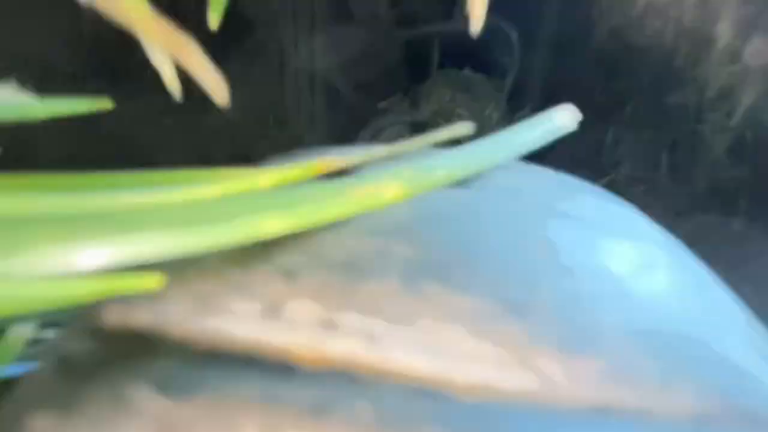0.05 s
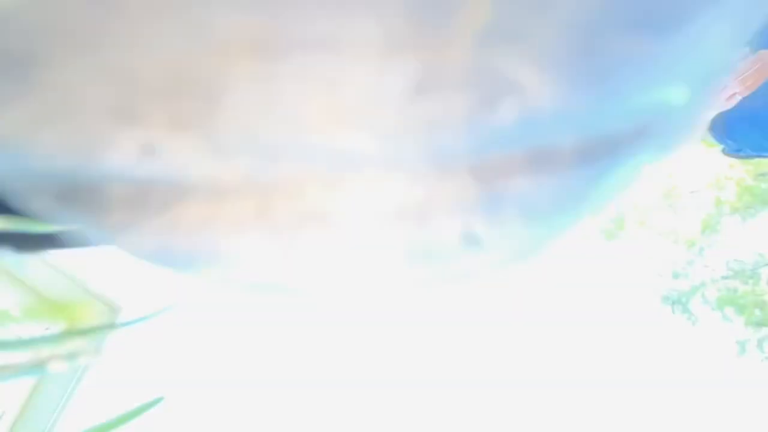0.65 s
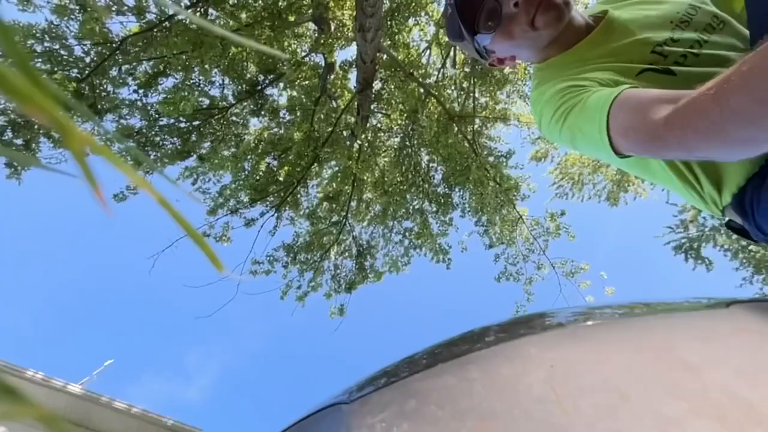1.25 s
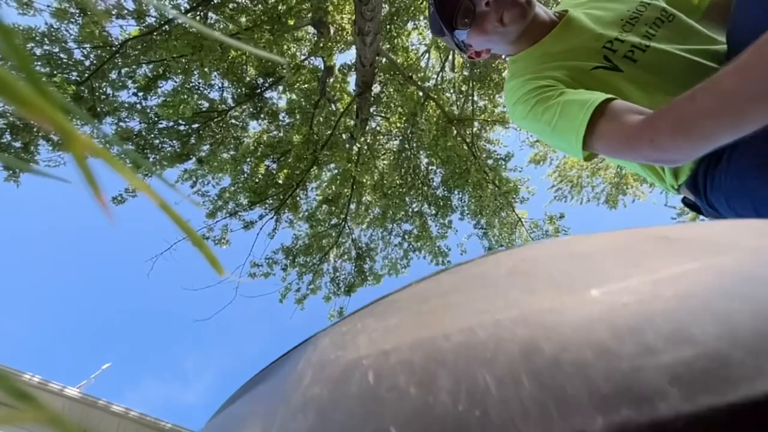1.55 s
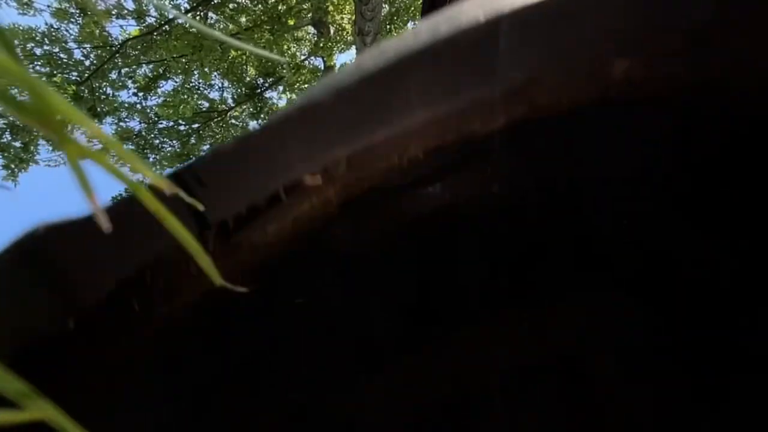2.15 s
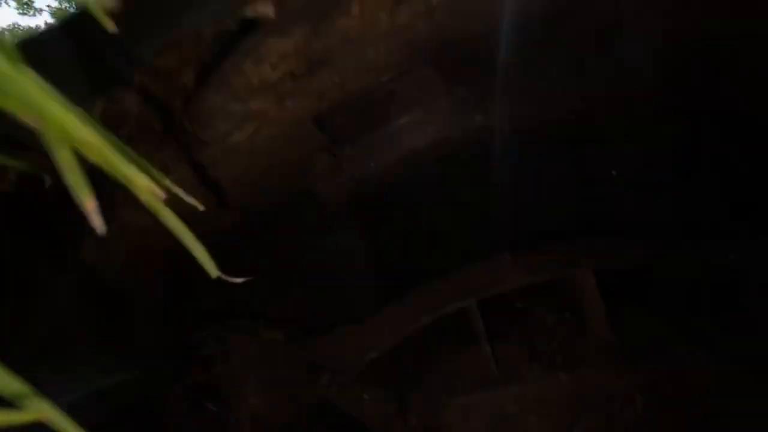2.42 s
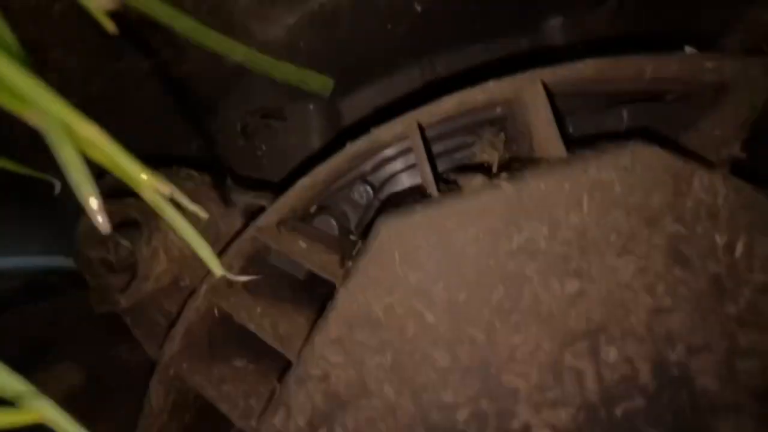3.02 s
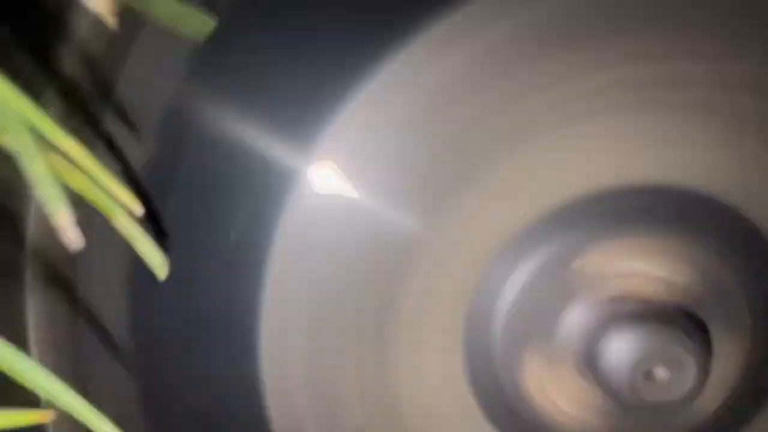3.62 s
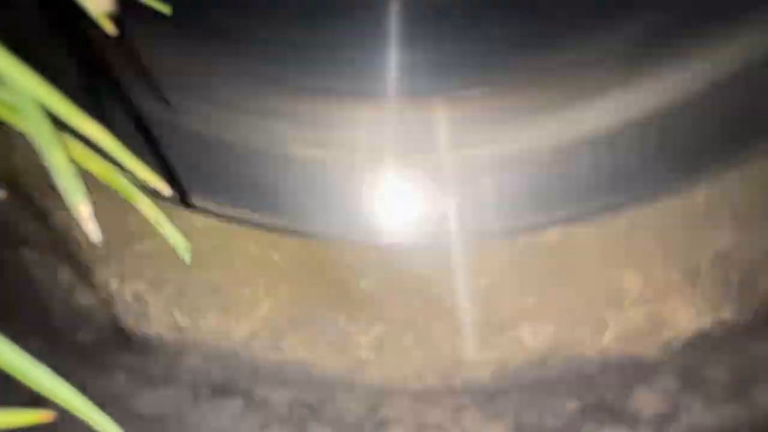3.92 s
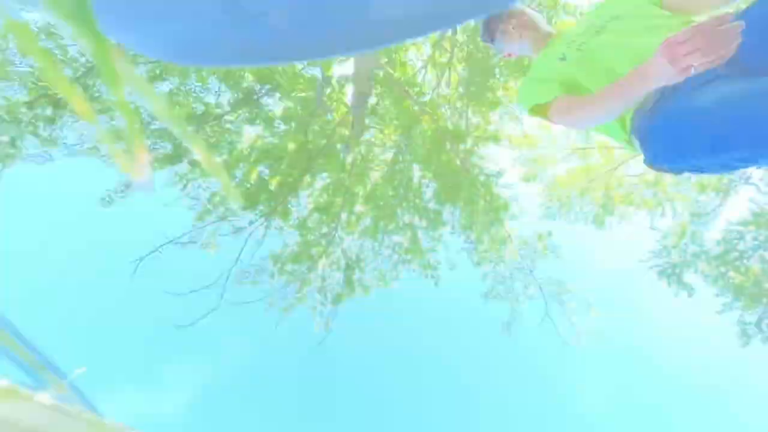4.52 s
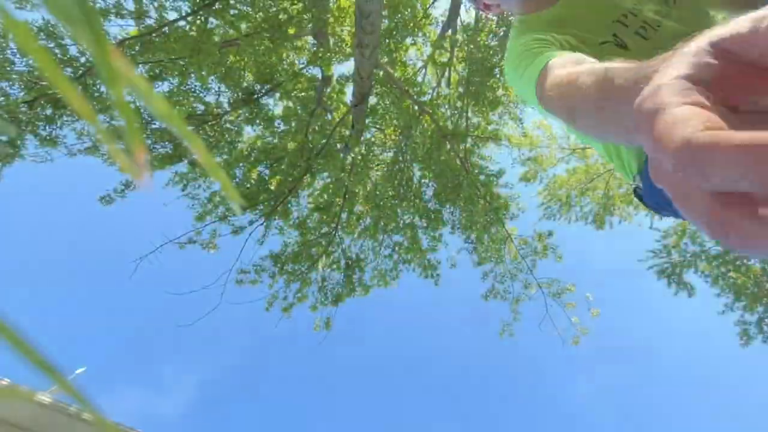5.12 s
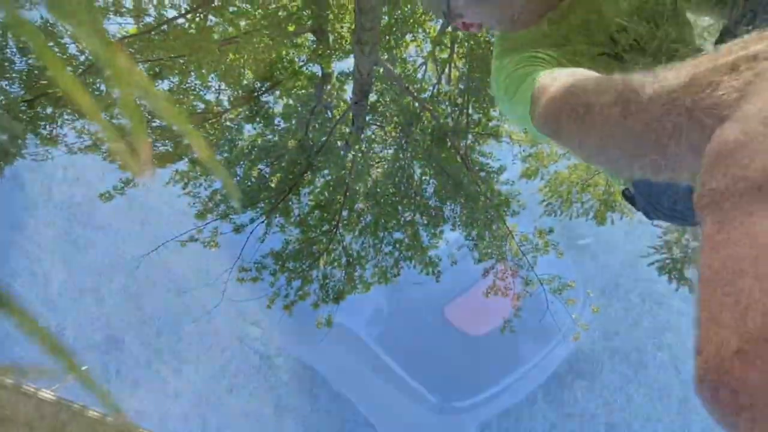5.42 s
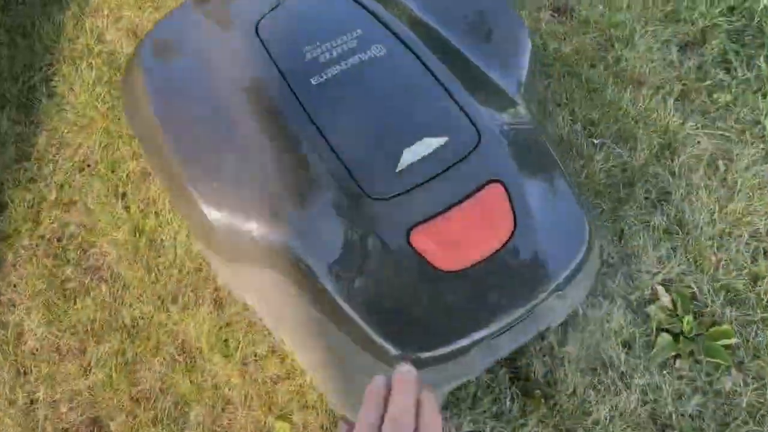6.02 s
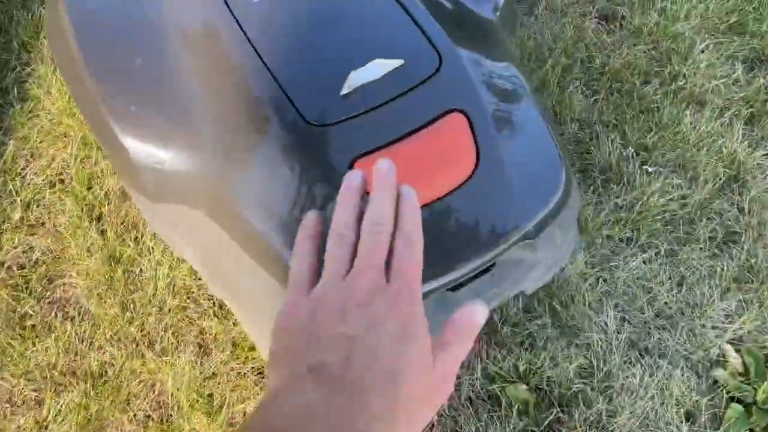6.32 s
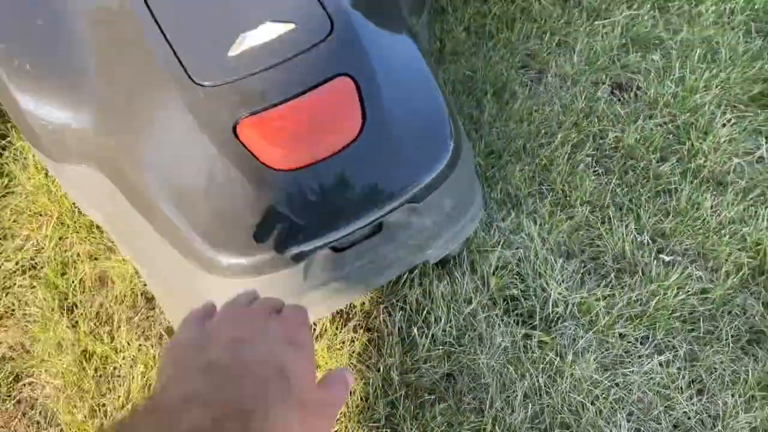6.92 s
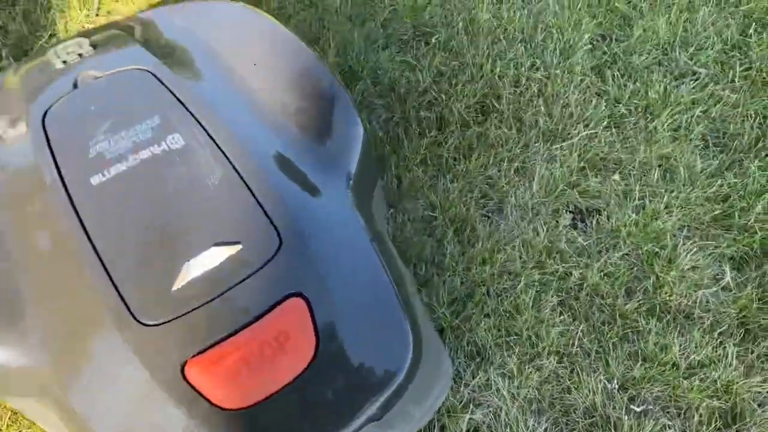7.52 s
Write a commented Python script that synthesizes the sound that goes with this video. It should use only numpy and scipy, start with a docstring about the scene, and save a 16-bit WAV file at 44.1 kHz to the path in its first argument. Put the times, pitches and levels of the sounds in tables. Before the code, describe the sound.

Slowed, muffled rolling and grass cutting with a few soft bumps draw near at ground level. Then the robotic mower's spinning blades sweep over the microphone in a brief, loud, hollow rush with a low hum and sharp rasps. Softer mowing and a thin gear whine follow. A few taps lead to one sharp slap on the plastic shell, which rattles, and the mower fades into faint outdoor air.

```python
"""A robotic mower rolls up to a microphone lying in the lawn, at first dull and deep as in slow motion.
Its blade disc passes right overhead: each blade pushes a pulse of air, which makes a hum, and thousands
of tiny grass cuts ring the hollow under the shell. Gears whine as it moves off. Then, heard from above,
it drives on until a hand slaps the stop button; the plastic shell rattles and the motors run down."""
import sys
import numpy as np
from scipy import signal
from scipy.fft import rfft, irfft, next_fast_len
from scipy.io import wavfile
from scipy.ndimage import uniform_filter1d

SR = 44100
rng = np.random.default_rng(int(sys.argv[2]) if len(sys.argv) > 2 else 0)


def unload_wav(signal):
    """Save mono or channel-first audio to the path in sys.argv[1] as 16-bit WAV at rate SR, clipped to [-1, 1]."""
    wavfile.write(
        sys.argv[1],
        SR,
        np.round(np.clip(np.atleast_2d(signal).T, -1, 1) * 32767).astype(np.int16),
    )


N = 341798
TIME, FFT_SIZE = np.arange(N) / SR, next_fast_len(N)
FREQS = np.fft.rfftfreq(FFT_SIZE, 1 / SR)
HIT_SIZE, LEAD_S = 16384, .01  # samples in one short hit, and the pause before it starts
HIT_TIME = np.maximum(np.arange(HIT_SIZE) / SR - LEAD_S, 0)
HIT_FREQS = np.fft.rfftfreq(HIT_SIZE, 1 / SR) + 1
SLOW, SLOW_EDGE_HZ, SLOW_END_S = .25, 4830, 3.06  # slow motion: speed, treble limit, end
BLADE_HZ = 114.3  # blades passing per second
LEAVING_S, STOP_S = 4.2, 6.86  # the mower moves off; its motors are switched off

# resonances of the hollow under the shell: f/Hz, width/Hz, lift/dB
HOLLOW_RESONANCES = [(566, 31, 4), (1049, 100, 9), (1590, 150, 2), (2340, 170, 2.5), (2784, 170, 7),
                     (3153, 96, 4.5), (3430, 130, 4.5), (3740, 180, -3), (3860, 120, 4.5), (4760, 44, 9),
                     (5350, 570, 8.5), (5834, 250, -10.5), (6560, 790, 5), (11200, 780, -4.5),
                     (12300, 1600, -0.5)]
# the microphone's two openings, lying in the grass and held above:
# f/Hz, likeness of left and right/0-1, lead of left/rad, left over right/dB
MIC_IN_GRASS = [(100, 0.5, 1, 4), (487, 0.4, 1.68, 1), (1100, 0.25, 2.5, 0.5), (1990, 0.2, 3, -2.5),
                (3140, 0.05, 2.5, 2), (5300, 0, 3, 8.5), (8000, 0.2, 2.5, 0.5), (8950, .6, 0, -3.5),
                (9750, 0.6, 1.94, -2.5), (10700, .95, 0.5, -1), (13200, 1, 0, -0.5), (13800, 0.7, -0.2, 0),
                (14550, .5, -3, -1), (14900, 0.95, -2, 0.5)]
MIC_ABOVE = [(99, 0.66, 0.28, -1.5), (1600, 0.7, -0.7, 1.5), (2900, 0.24, 3, -2), (4240, 0.37, 2, -2.5),
             (4900, 0.64, 1.1, -1), (5980, 1, 3, 2), (7800, 1, 6.5, 0), (8370, .9, 7.5, -2.5),
             (10500, 1, 8.5, 1.5), (11100, 0.88, 9.5, -1), (11400, .45, 14.5, -1.5), (11800, 1, 13, 1),
             (13100, 0.83, 13.5, -1), (14500, .9, 15.5, 1)]


def amp(db):
    """Turns decibels into a gain."""
    return 10 ** (np.asarray(db) / 20)


def unit(x):
    """Scales a signal to an average power of 1."""
    return x / np.sqrt(np.mean(x ** 2) + 1e-20)


def read(points, hz):
    """Reads between the rows of a table, on a scale of octaves."""
    f, value = np.transpose(points)
    return np.interp(np.log(hz + 1), np.log(f + 1), value)


def curves(rows):
    """Turns rows of (t/s, values...) into one curve per value, sample by sample."""
    s, *columns = np.transpose(rows)
    return [np.interp(TIME, s, c) for c in columns]


def between(start, end):
    """Fades in after start and out before end."""
    return np.clip(np.minimum(TIME - start, end - TIME) * 10, 0, 1)


def since(s):
    """Seconds gone by since s, zero before."""
    return np.maximum(TIME - s, 0)


def wander(per_s):
    """A random curve of size 1 that turns per_s times a second."""
    steps = rng.standard_normal(4096)
    return unit(np.interp(TIME * per_s, np.arange(len(steps)), steps))


def panned(x, pan_db):
    """Makes the left side pan_db louder than the right."""
    return np.vstack([x * amp(pan_db / 2), x * amp(-pan_db / 2)])


def place(hits):
    """Mixes (start time, stereo sound) pairs into one track."""
    mix = np.zeros((2, N))
    for s, sound in hits:
        part = mix[:, max(round((s - LEAD_S) * SR), 0):][:, :sound.shape[1]]
        part += sound[:, :part.shape[1]]
    return mix


def low_pass(x, hz):
    """Cuts off the treble above hz."""
    return signal.oaconvolve(x, signal.firwin(601, hz, window=("kaiser", 9), fs=SR)[None], "same")


def lift(resonances, at_hz):
    """How many dB a set of resonances adds at each frequency."""
    return sum(db / (1 + (2 * (at_hz - hz) / width) ** 2) for hz, width, db in resonances)


def microphone(pair, mic, hz):
    """Turns two unrelated spectra into what the left and right openings pick up."""
    f, *columns = np.transpose(mic)
    same, phase, pan_db = (np.interp(hz, f, c) for c in columns)
    same = np.clip(same, 0, 1)
    right = (same * pair[0] + np.sqrt(1 - same ** 2) * pair[1]) * np.exp(-1j * phase)
    return np.array([pair[0], right]) * panned(1, pan_db)


def grass_cuts(per_s, spread_db, hiss, patch_db, size):
    """Spectra of two streams of tiny cuts in a hiss of air; each tuft favours other pitches."""
    strength = amp(spread_db * np.minimum(rng.exponential(1, (2, N)), 4)) * rng.choice([-1, 1], (2, N))
    clicks = unit(strength * (rng.random((2, N)) < per_s / SR))
    frames = signal.stft(clicks + hiss * rng.standard_normal((2, N)), nperseg=size)[2]
    patches = uniform_filter1d(rng.standard_normal(frames.shape[1:]), size=4, axis=0)  # blur in pitch
    patches = unit(uniform_filter1d(patches, size=6, axis=1))  # and in time
    return rfft(signal.istft(frames * amp(patch_db * patches))[1][:, :N], FFT_SIZE)


def travel(layers, span):
    """Each layer's level in dB: a steady drift, brief rustles, and a bright swell as slow motion ends."""
    # rustles and the swell: t/s, length/s, rolling lift/dB, cutting lift/dB, fizz lift/dB
    swells = [(0, 0.42, 2, 10.5, 0), (0.42, 0.14, 1, -2.5, 0), (1.491, 0.24, 3, 3.5, 0),
              (2.843, 0.057, 3, 1, 0), (3.074, .04, 1, 2, 1), (3.167, 0.12, 2, 5.5, 8.5),
              (4.665, 0.11, 0, 9, 8.5), (5.313, 0.093, 3, 6.5, 4), (5.474, .09, 1, 6.5, 5.5),
              (5.675, 0.08, 0, 4.5, 2.5), (6.092, 0.22, 4.5, 4, 2.5), (6.877, 0.12, 2, -1.5, -1),
              (7.184, 0.095, 5.5, 8, 8)]
    attack_s, release_s, lift_db = 0.012, 0.019, 0
    for s, length, *lifts in swells:
        swell = np.minimum(since(s) / attack_s, 1) * np.exp(-since(s + length) / release_s)
        lift_db = lift_db + np.outer(lifts, swell)
    return [db + drift * (TIME - span[0]) + extra for (db, drift), extra in zip(layers, lift_db)]


def mowing(cuts, levels, span, colour, flutter_db, flutter_per_s, fade_s,
           speed=0.97, hollow=HOLLOW_RESONANCES, mic=MIC_IN_GRASS):
    """Cuts and air ring the hollow, in up to three layers: low rolling, middle cutting, high fizz."""
    full_hz = FREQS / speed  # slowing down lowers every resonance alike
    spectra = microphone(cuts, mic, full_hz) * amp(read(colour, FREQS) + lift(hollow, full_hz))
    band = np.digitize(FREQS, [1800, 7000])  # the layers meet here, in Hz
    tufts, out = wander(flutter_per_s), 0
    for k, level_db in enumerate(levels):
        # tufts of grass shake all layers together, and each a little on its own
        flutter = amp(flutter_db * (tufts + wander(flutter_per_s) / 2))
        layer = irfft(spectra * (band == k), FFT_SIZE)[:, :N] * flutter
        out = out + layer / np.std(layer.mean(0)) * amp(level_db)
    inside_s = np.minimum(TIME - span[0], span[1] - TIME)
    return out * np.sin(np.pi / 2 * np.clip(.5 + inside_s / fade_s, 0, 1))


def approach():
    """In slow motion the cuts are sparse and dull and the wheels rumble."""
    # rolling and cutting, far and near: starting level/dB, drift/(dB per s)
    far_levels = [(-43.5, -9.5), (-54.5, -1.5)]
    near_levels = [(-43.5, 4.82), (-49.5, 5.86)]
    # tone colour of the mower, far and near: f/Hz, level/dB
    far_colour = [(30, 1), (80, -6), (122, -23.5), (168, 5), (240, -20.5), (320, -2), (800, -5.5),
                  (1300, -8.5), (1900, -13), (2400, 0.5), (3600, -14), (4800, -19.5)]
    near_colour = [(20, -5), (31, 4), (45, -1.5), (95, 1), (250, -2.5), (500, -9), (900, -10), (1300, -10),
                   (1900, -14), (2350, 0), (3000, -8), (3800, -15), (4000, -36.5), (4300, -11.5),
                   (4800, -19)]
    far_span, near_span = (-0.031, 1.192), (1.263, SLOW_END_S)
    cuts = grass_cuts(per_s=500, spread_db=1.5, hiss=0.92, patch_db=2, size=1024)
    far = mowing(cuts, travel(far_levels, far_span), far_span, far_colour,
                 flutter_db=3.5, flutter_per_s=33, fade_s=0.051, speed=SLOW)
    near = mowing(cuts, travel(near_levels, near_span), near_span, near_colour,
                  flutter_db=1.5, flutter_per_s=40, fade_s=0.093, speed=SLOW)
    return low_pass(far + near, SLOW_EDGE_HZ)


def whine(lines, level_db, waver, blur_per_s, pan_db, sag=0):
    """Tones that waver in pitch together, each blurred into a narrow band of noise."""
    bend, out = waver * wander(9) - sag, np.zeros((2, N))
    for hz, db in lines:
        angle = 2 * np.pi * np.cumsum(hz * (1 + bend)) / SR
        tone = amp(db) * (wander(blur_per_s) * np.cos(angle) + wander(blur_per_s) * np.sin(angle))
        out += [tone, np.roll(tone, rng.integers(-20, 20))]  # each tone takes its own path to each side
    return out * panned(amp(level_db), pan_db)


def gears():
    """Motors and gears whine, louder when near; the load bends their pitch and uneven teeth blur it."""
    # tones under the shell, of the wheel motors, and above the shell: f/Hz, relative level/dB
    under_tones = [(1858, -41), (2218, -45), (2649, -42), (2803, -38), (2936, -42), (3101, -40),
                   (3139, -39), (4555, -44), (4632, -46), (5020, -39), (5151, -42), (5258, -38),
                   (5401, -39), (6455, -50), (9157, -45), (10325, -47), (12112, -46)]
    wheel_tones = [(590, -61), (705, -58.5), (1400, -60.5)]
    above_tones = [(258.4, -52.5), (699.8, -52), (1017, -58), (1846, -64), (3100, -62)]
    slow_db, = curves([(0, -18.5), (1.19, -32), (1.225, -44), (1.26, -16), (3, -14)])
    slow_tones = [(hz * SLOW, db + 4.5 * np.log2(min(hz / 5000, 1))) for hz, db in under_tones]
    slowed = whine(slow_tones, slow_db, waver=.003, blur_per_s=18, pan_db=5.5) * between(-1, 3.1)
    under_db = disc_pass(top_db=2.0, attack_s=0.093, release_db_per_s=39.5)
    under = whine(under_tones, under_db, waver=.0006, blur_per_s=24, pan_db=2.5) * between(3.1, 4.4)
    wheels_db, = curves([(4.3, 10), (5.2, -1)])
    sag = .07 * since(LEAVING_S)  # the pitch sinks as the wheels take up load
    wheels = whine(wheel_tones, wheels_db, waver=0.0041, blur_per_s=70, pan_db=9, sag=sag)
    above = whine(above_tones, motor_level() - 2, waver=0.003, blur_per_s=28, pan_db=1.5)
    return slowed + under + wheels * between(4.1, 5.5) + above * between(5.35, 7.35)


def burst(colour, ring_s, mic):
    """Noise of a given tone colour that dies away by 60 dB in ring_s."""
    dying = rng.standard_normal((2, HIT_SIZE)) * amp(-60 * HIT_TIME / ring_s) * (HIT_TIME > 0)
    return irfft(microphone(rfft(dying) * colour, mic, np.fft.rfftfreq(HIT_SIZE, 1 / SR)))


def onset(rise_s):
    """The quick swell at the start of a hit."""
    return 1 - np.exp(-HIT_TIME / rise_s)


def noise_hit(db, centre_hz, octaves, rise_s, ring_s, pan_db, lift_db=0):
    """A band of noise that swells and dies."""
    colour = np.exp(-(np.log2(HIT_FREQS / centre_hz) / octaves) ** 2 / 2) * amp(lift_db)
    noise = burst(unit(colour), ring_s, mic=[(1000, 0.87, 0.0085, 0.0036)])
    return noise * panned(amp(db - 8.0) * onset(rise_s), pan_db)


def soft_thuds():
    """Soft, low thuds; the last is the microphone being picked up."""
    # thuds: t/s, relative level/dB, centre/Hz
    thuds = [(0.197, -33.5, 200), (0.235, -33, 190), (0.322, -29, 170), (3.392, -13, 450),
             (4.089, -15.5, 367), (5.333, -28, 55.1)]
    for s, db, centre_hz in thuds:
        yield s, noise_hit(db, centre_hz, octaves=0.35, rise_s=0.0025, ring_s=0.13, pan_db=3.5)


def snaps():
    """Stalks snap and the button's latch ticks; slow motion dulls a snap but for a faint bright tip."""
    # ticks: t/s, relative level/dB, centre/Hz, width/octaves, ring time/s, left over right/dB
    ticks = [(.222, -26, 1340, 0.6, .05, 23), (.316, -23.5, 2900, 0.34, .04, 4),
             (.391, -13.5, 3350, 0.47, .015, 6), (3.08, -23, 4500, .25, .04, -5),
             (3.4, -6, 3840, 1.2, .014, -8), (5.444, -20.5, 9350, .13, 0.013, -7),
             (6.771, -16, 5000, 1.1, 0.011, 1), (7.394, -26.5, 2250, 1.1, .006, 8)]
    for s, db, centre_hz, octaves, ring_s, pan_db in ticks:
        snap = noise_hit(db, centre_hz, octaves, rise_s=0.00035, ring_s=ring_s, pan_db=pan_db)
        if s < SLOW_END_S:
            snap = low_pass(snap, SLOW_EDGE_HZ) + amp(-29) * snap
        yield s, snap


def ring(modes, damping):
    """The dying tones of a struck body; more damping shortens them."""
    return sum(amp(db - 60 * HIT_TIME * damping / ring_s) * np.sin(2 * np.pi * hz * HIT_TIME)
               for hz, db, ring_s in modes)


def chassis_bumps():
    """Bumps on the approach make the mower's frame ring deeply."""
    # bumps: t/s, relative level/dB, brightness/(dB per octave)
    bumps = [(0.225, -20.5, 1), (0.33, -25, -1.5), (3.011, -33.5, 2.5)]
    # the frame's own tones: f/Hz, level/dB, base ring time/s
    frame_modes = [(78.6, -8.5, 0.25), (170, -1.5, 0.14), (327, -11.5, 0.086), (463, -1, 0.066),
                   (533, -5.5, 0.064), (830, -8, 0.04)]
    for s, db, tilt_db in bumps:
        modes = [(hz, mode_db + tilt_db * np.log2(hz / 170), ring_s)
                 for hz, mode_db, ring_s in frame_modes]
        yield s, panned(amp(db) * ring(modes, damping=0.92) * onset(0.0031), pan_db=6.7)


def blade_rasps():
    """Blades rasp through tufts and ring the hollow, lower and longer in slow motion."""
    # rasps: t/s, relative level/dB, full-speed centre/Hz, width/octaves, full-speed ring time/s
    rasps = [(1.706, -27, 3490, 0.34, 0.067), (2.565, -32, 1490, 0.47, 0.1),
             (2.867, -23, 1520, 0.12, 0.065), (3.325, -23.5, 5140, .13, 0.24),
             (3.506, -14, 5050, .12, 0.26), (3.556, -11, 2900, 0.67, 0.12), (3.595, -13.5, 4240, 0.43, .13),
             (3.648, -14.5, 5400, .05, 0.12), (3.719, -6, 2480, 0.49, 0.076),
             (3.752, -7, 4800, 0.36, 0.059), (3.774, -12.5, 2840, .2, 0.12),
             (3.836, -13.5, 4000, 0.49, 0.25), (3.876, -4.5, 2900, 0.54, 0.067),
             (3.933, -11.5, 3100, 0.14, 0.13), (4.038, -12.5, 5300, 0.11, 0.076),
             (4.117, -17, 5300, 0.2, 0.18)]
    for s, db, centre_hz, octaves, ring_s in rasps:
        speed = SLOW if s < SLOW_END_S else 1
        yield s, noise_hit(db, centre_hz * speed, octaves, rise_s=0.0018 / speed, ring_s=ring_s / speed,
                           pan_db=10.5, lift_db=lift(HOLLOW_RESONANCES, HIT_FREQS / speed))


def blade_hum():
    """Each blade pushes a pulse of air; the hum swells as the disc's rim passes and shakes in its wake."""
    # the front and back rim pass: t/s, level/dB, half-width/s, step per harmonic/dB, roughness/0-1
    rims = [(3.529, -9.5, 0.069, 1, .1), (3.96, -34, 0.07, 5, 0.5), (4.09, -30.5, 0.1, -5, .5)]
    # under the disc, left and right feel each pulse at different times
    pan_db, lag = curves([(4.1, 4.5, 2.14), (4.6, -1, 0.24)])
    cycles = np.cumsum(BLADE_HZ * (1 + 0.0045 * wander(8.4))) / SR
    out, through_shell = 0, amp(-49 + motor_level())
    for k, harmonic_db in enumerate([-6.0, -8.0, -20, -23]):
        wake, swell = wander(45), 0
        for s, db, width_s, step_db, rough in rims:
            distance = (TIME - s) * (1 + .35 * k) / width_s  # higher harmonics swell more briefly
            swell = swell + amp(db + k * step_db) * (1 + rough * wake) / (1 + distance ** 2) ** 1.49
        angle = 2 * np.pi * ((k + 1) * cycles + rng.random()) + 0.36 * wake * between(3.58, 4.2)
        tone = np.sqrt(2) * np.cos([angle, angle - lag])
        out = out + tone * panned(amp(harmonic_db) * (swell + through_shell), pan_db)
    return out * between(2.6, 7.4)


def disc_pass(top_db, attack_s, release_db_per_s):
    """Level in dB as the disc comes out from behind the mower's skirt, stays overhead and moves away."""
    arrives_s, leaves_s, skirt_db = 3.298, 3.902, 23
    hidden = np.exp(np.minimum((arrives_s - TIME) / attack_s, 2))
    return top_db - skirt_db * hidden - release_db_per_s * since(leaves_s)


def with_rush(levels):
    """Adds the disc's rush to each layer's level; the blades chop the fizz, most near the back rim."""
    # rush in rolling, cutting and fizz: level overhead/dB, attack/s, release/(dB per s)
    rushes = [(-26, 0.033, 30.5), (-25, 0.091, 42.5), (-24, 0.054, 36.5)]
    rolling, cutting, fizz = [20 * np.log10(np.hypot(amp(db), amp(disc_pass(*rush))))
                              for db, rush in zip(levels, rushes)]
    chop_db = 0.9 + 3 / (1 + ((TIME - 4.03) / .11) ** 2)
    return rolling, cutting, fizz + chop_db * np.cos(2 * np.pi * BLADE_HZ * TIME)


def open_treble(x, start_s=2.952, octaves_per_s=4, size=512):
    """As the slow motion ends, the treble limit glides upward."""
    hz, t, frames = signal.stft(x, SR, nperseg=size)
    edge_hz = SLOW_EDGE_HZ * 2 ** np.clip((t - start_s) * octaves_per_s, 0, 4)
    return signal.istft(frames / (1 + (hz[:, None] / edge_hz) ** 20), SR, nperseg=size)[1][:, :N]


def overhead():
    """The disc shreds grass right over the microphone and moves off."""
    # rolling, cutting and fizz, under the mower and as it leaves: starting level/dB, drift/(dB per s)
    under_levels = [(-41, -29.5), (-42, -38.5), (-62.5, 4.5)]
    leaving_levels = [(-45, -1.5), (-54.5, -4), (-55, -3)]
    # tone colour from the same two sides: f/Hz, level/dB
    under_colour = [(30, -27.5), (70, -1.5), (180, -0.5), (300, 4.5), (550, 4.5), (1050, -0.5), (1400, 0),
                    (2300, -11), (3000, -5.5), (4000, -12), (5300, -11.5), (7500, -15.5), (9300, -2.5),
                    (15000, -16.5)]
    leaving_colour = [(30, -40), (80, -12), (120, -15), (215, -18.5), (380, -3), (570, 3.5), (850, -4),
                      (1900, -11.5), (2800, -12), (4000, -16.5), (5300, -20), (7600, -13.5), (9500, -2.5),
                      (15000, -16.5)]
    under_span, leaving_span = (3.065, LEAVING_S), (LEAVING_S, 5.31)
    cuts = grass_cuts(per_s=3000, spread_db=3.5, hiss=1.0, patch_db=3.0, size=512)
    under = mowing(cuts, with_rush(travel(under_levels, under_span)), under_span, under_colour,
                   flutter_db=1.0, flutter_per_s=110, fade_s=0.03)
    leaving = mowing(cuts, with_rush(travel(leaving_levels, leaving_span)), leaving_span, leaving_colour,
                     flutter_db=0.5, flutter_per_s=56, fade_s=0.041)
    return open_treble(under) + leaving


def deck_ring():
    """Clippings pelt the deck around the disc; each of its tones swells and drifts on its own."""
    # the deck's tones: f/Hz, level/dB, left over right/dB
    deck_tones = [(2760, -33, 3), (3120, -33, 6), (4950, -35, 11.5), (5280, -30.5, 11)]
    level_db = disc_pass(top_db=0.0, attack_s=0.11, release_db_per_s=41)
    return sum(whine([(hz, db)], level_db + 3 * wander(22), waver=.012, blur_per_s=170, pan_db=pan_db)
               for hz, db, pan_db in deck_tones)


def garden_air():
    """Faint outdoor air, heard once the microphone is out of the grass."""
    # tone colour of still air: f/Hz, level/dB
    air_colour = [(25, -7), (64, 1), (145, -10), (245, -8.5), (400, -27), (700, -20), (1600, -23),
                  (2200, -38), (5000, -35.5), (15000, -39)]
    spectra = rfft(rng.standard_normal((2, N)), FFT_SIZE) * amp(read(air_colour, FREQS))
    air = irfft(spectra, FFT_SIZE)[:, :N]
    level_db, = curves([(5.4, -68), (7.4, -58)])
    return amp(level_db) * unit(air + .5 * air[::-1]) * between(5.25, 8)


def mowing_from_above():
    """From above the shell muffles the cutting, which dies away after the stop."""
    # rolling, cutting and fizz: starting level/dB, drift/(dB per s)
    above_levels = [(-45.5, 3.7), (-54.5, 1.14), (-56.5, 2)]
    # how the same layers run down: sudden drop/dB, fall/(dB per s)
    run_down = [(0, 48), (1, 31), (7, 28)]
    # tone colour from above: f/Hz, level/dB
    above_colour = [(25, -28), (65, -3.5), (160, -2.5), (240, 4.5), (750, 3.5), (1100, -4.5), (1400, -5),
                    (2100, -13.5), (2800, -12), (4000, -18), (5200, -19.5), (7200, -19.5), (9000, -20.5),
                    (15000, -28.5)]
    # resonances of the shell that carry upward: f/Hz, width/Hz, lift/dB
    top_resonances = [(710, 43, -1.5), (1067, 58, 9.5), (2500, 200, -3), (2760, 90, 8), (3200, 63, 6.5),
                      (5300, 610, 7.5), (9240, 1700, 15), (13100, 1600, 10.5)]
    span = (5.31, 7.8)
    cuts = grass_cuts(per_s=3000, spread_db=2.0, hiss=1.57, patch_db=2.5, size=512)
    levels = [db - drop_db * (TIME > STOP_S) - fall * since(STOP_S)
              for db, (drop_db, fall) in zip(travel(above_levels, span), run_down)]
    return mowing(cuts, levels, span, above_colour, flutter_db=1, flutter_per_s=70, fade_s=0.054,
                  hollow=top_resonances, mic=MIC_ABOVE)


def knocks():
    """The microphone bumps as it is picked up; then knocks ring the shell, the stop button loudest."""
    # bumps and knocks: t/s, relative level/dB, brightness/(dB per octave), left over right/dB, ring/s
    blows = [(5.325, -27.5, -2, 9, .06), (5.335, -21.5, 1, 11.5, 0.063), (5.353, -27, 2, 8, 0.045),
             (6.096, -28.5, 1.5, -6, .07), (6.178, -26, 1.5, -2, 0.056), (6.222, -28, 0.5, -2, .06),
             (6.268, -28, -4, 0, .05), (6.413, -22.5, 3, -2.5, .05), (6.5625, -18, 1, -3, 0.059),
             (6.569, -18.5, 0.5, -4, .045), (6.598, -28, 1, -1.5, 0.044), (6.714, -27, -3, -1, .08),
             (6.761, -21, 1.5, 0, .08), (6.7714, -4, 0, -1, .1), (6.7856, -10, 1, -2, .09),
             (6.794, -14, -0.5, 0, .08), (6.807, -17.5, -1.5, 0, .07), (6.859, -27, -3.5, 0, .07),
             (6.896, -22.5, -1.5, -3, 0.056), (6.9043, -17, -4, 0, .075), (6.924, -18, -7, 0, 0.091),
             (6.978, -23.5, -3.5, 0, 0.065), (7.123, -34, -2.5, -6, .07), (7.224, -34, -8, 2, 0.054),
             (7.278, -28.5, -11, 2, 0.075)]
    # tone colour of a knock: f/Hz, level/dB
    knock_colour = [(40, -33), (130, -12.5), (210, -4.5), (420, -0.5), (540, -7.5), (1100, -4),
                    (1700, -10.5), (2300, -14), (5000, -17.5), (6500, -26), (8500, -31), (15000, -44)]
    # the plastic shell's own tones: f/Hz, level/dB, ring time in a 0.1 s knock/s
    shell_modes = [(234.4, 2, 0.11), (283, -1, 0.13), (411, 6.5, 0.11), (678, -4, 0.11), (886, -6, 0.09),
                   (1116, 3, 0.11), (1475, -12, 0.13), (1796, -10, 0.16)]
    treble = 1 / (1 + (2200 / HIT_FREQS) ** 4)
    octaves = np.log2(np.maximum(HIT_FREQS, 150) / 600)
    for s, db, tilt_db, pan_db, ring_s in blows:
        colour = unit(amp(read(knock_colour, HIT_FREQS) + tilt_db * octaves))
        body = burst(colour * (1 - treble), ring_s, MIC_ABOVE)
        crack = burst(colour * treble, ring_s * 0.71, MIC_ABOVE)  # the treble dies sooner
        blow = body + amp(2.0) * crack + amp(-14) * ring(shell_modes, damping=0.1 / ring_s)
        yield s, blow * panned(amp(db - 6.5) * onset(0.00032), pan_db)


def motor_level(nearest_s=6.27, rise_db_per_s=18.5, fall_db_per_s=25):
    """Level in dB of the motor tones from above: they draw near, hold, and fade after the stop."""
    return -rise_db_per_s * np.maximum(nearest_s - TIME, 0) - fall_db_per_s * since(STOP_S)


def drive_whine():
    """A thin, nearly pure gear tone that sags as the load grows."""
    # path of the tone: t/s, f/Hz, level/dB
    tone_path = [(5.4, 2750, -66), (5.72, 2790, -56.5), (6, 2784, -69), (6.6, 2720, -57.5), (7, 2680, -76)]
    hz, level_db = curves(tone_path)
    angle = 2 * np.pi * np.cumsum(hz * (1 + .002 * wander(30))) / SR
    tone = np.sqrt(2) * np.cos([angle, angle - 1.2])
    return tone * amp(level_db + 2.7 * wander(35)) * between(5.35, 7.1)


def scene():
    """The mower from approach to stop."""
    cutting = approach() + overhead() + deck_ring() + mowing_from_above()
    tones = blade_hum() + gears() + drive_whine()
    hits = place([*knocks(), *chassis_bumps(), *snaps(), *blade_rasps(), *soft_thuds()])
    return cutting + tones + hits + garden_air()


def record(dry):
    """Clips peaks at full scale and cuts off the highest treble."""
    return low_pass(np.clip(dry, -1, 1), hz=15600)


dry = scene()
out = record(dry)
unload_wav(out)
```